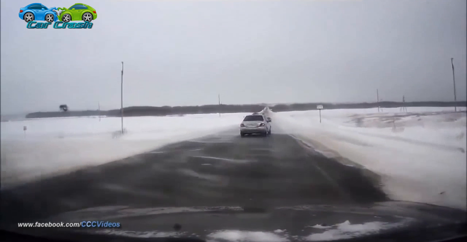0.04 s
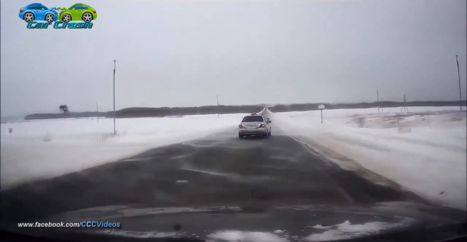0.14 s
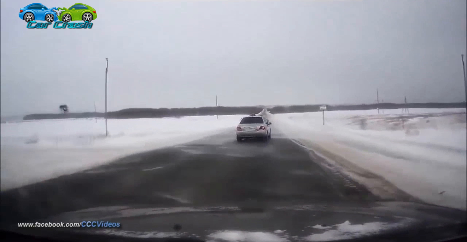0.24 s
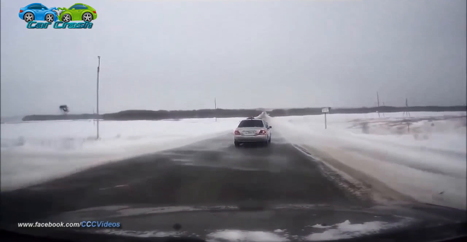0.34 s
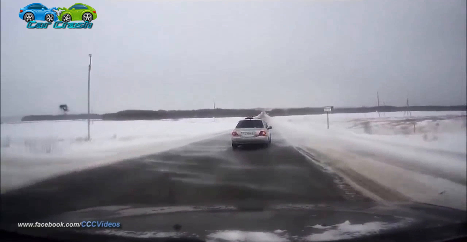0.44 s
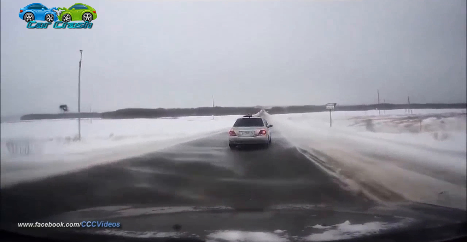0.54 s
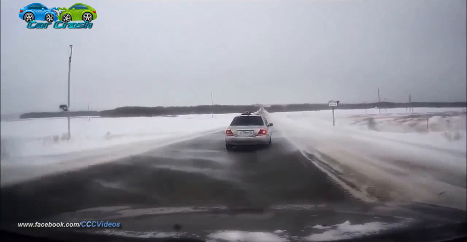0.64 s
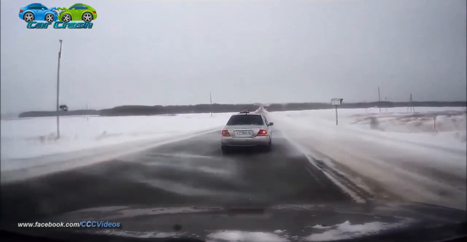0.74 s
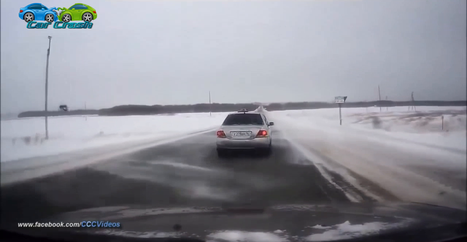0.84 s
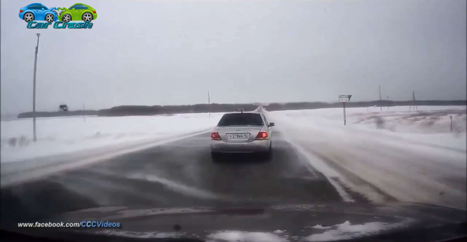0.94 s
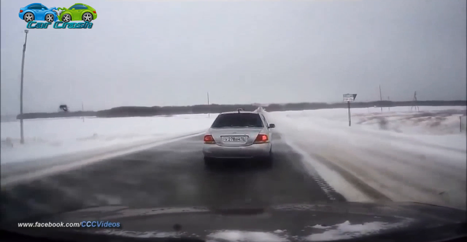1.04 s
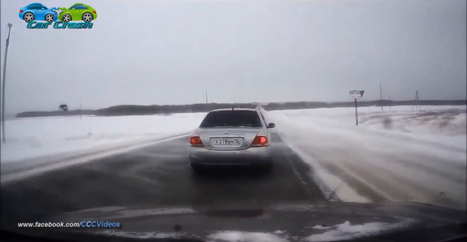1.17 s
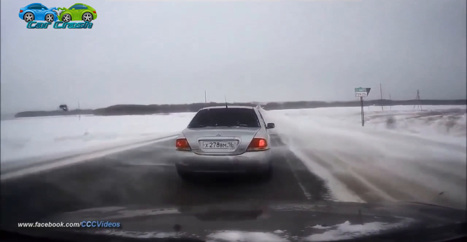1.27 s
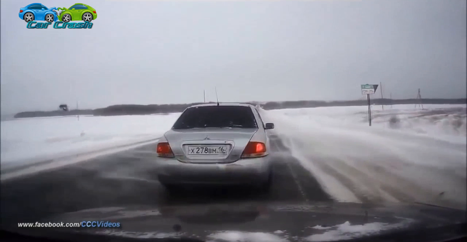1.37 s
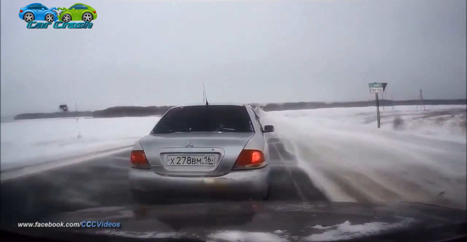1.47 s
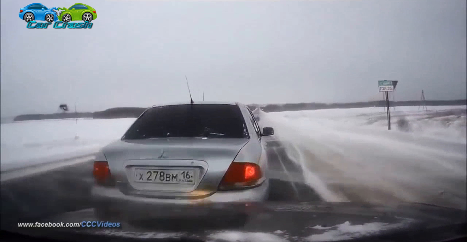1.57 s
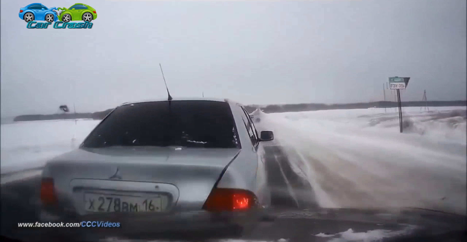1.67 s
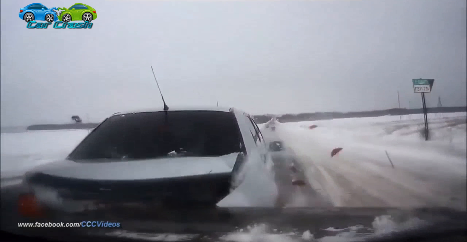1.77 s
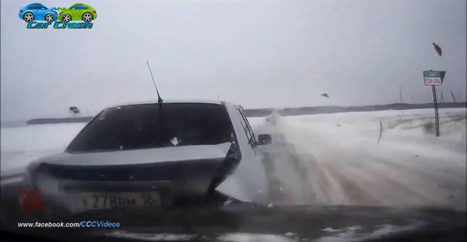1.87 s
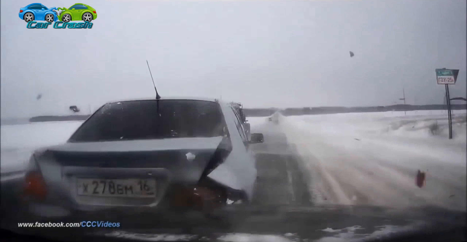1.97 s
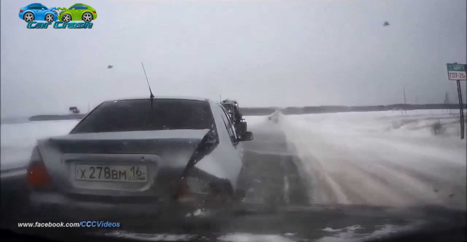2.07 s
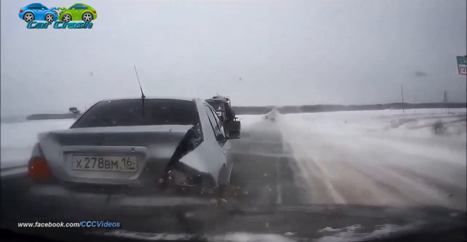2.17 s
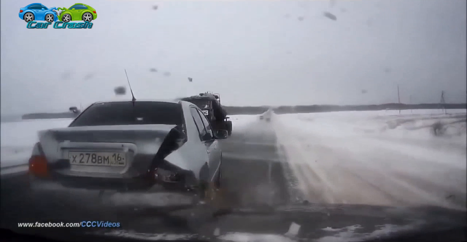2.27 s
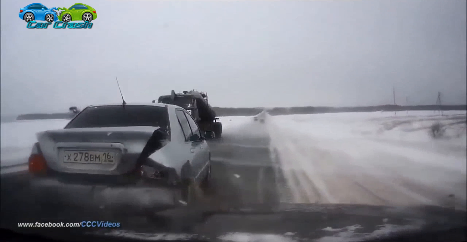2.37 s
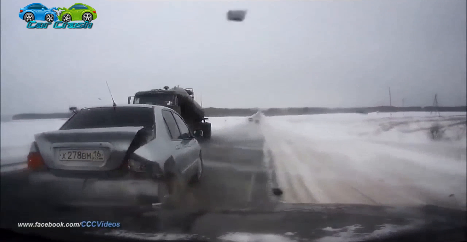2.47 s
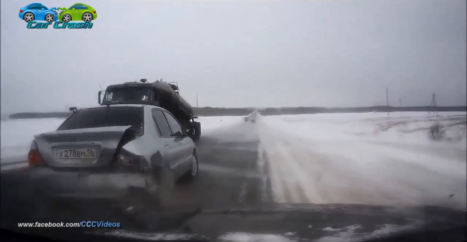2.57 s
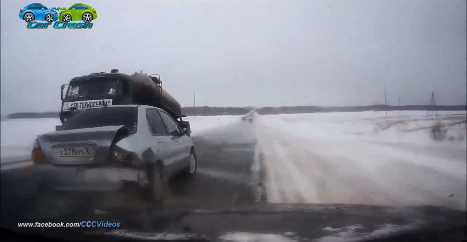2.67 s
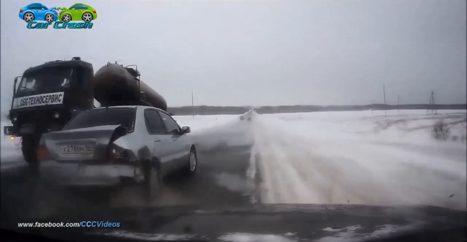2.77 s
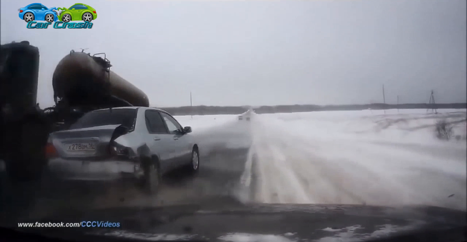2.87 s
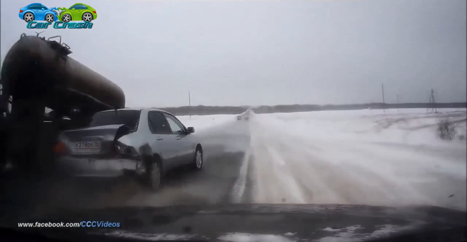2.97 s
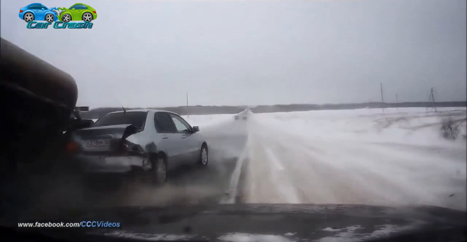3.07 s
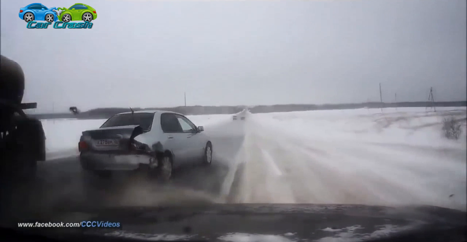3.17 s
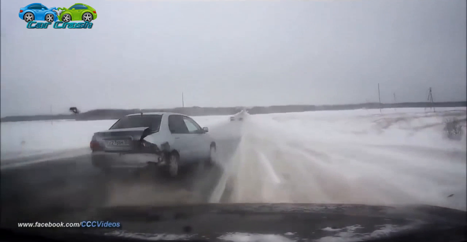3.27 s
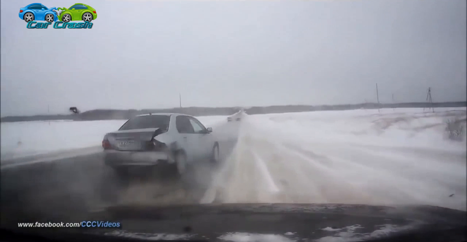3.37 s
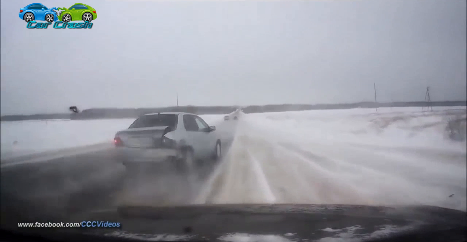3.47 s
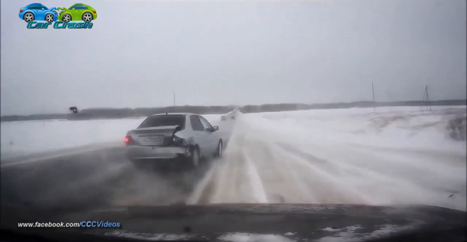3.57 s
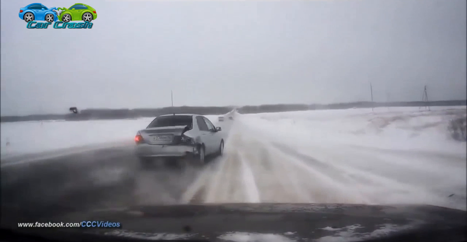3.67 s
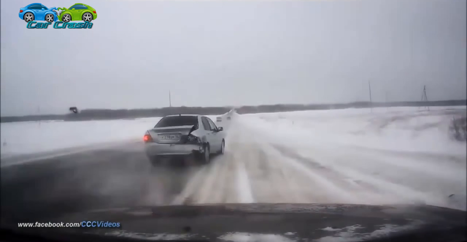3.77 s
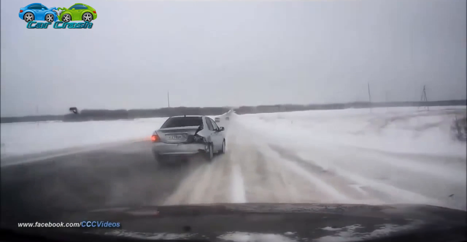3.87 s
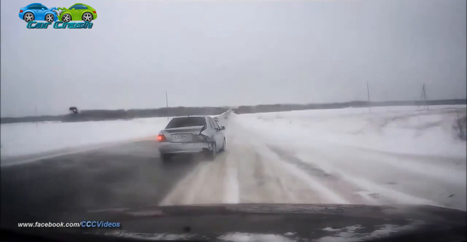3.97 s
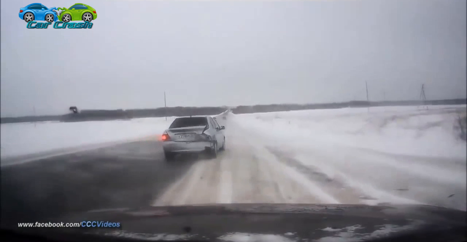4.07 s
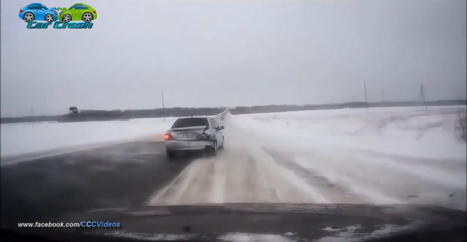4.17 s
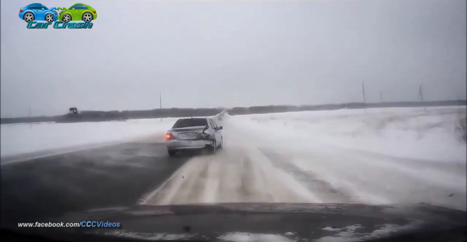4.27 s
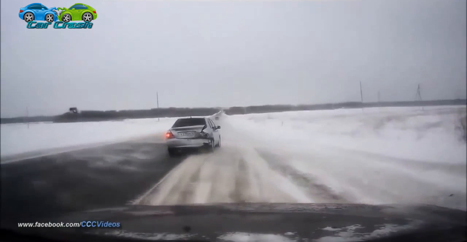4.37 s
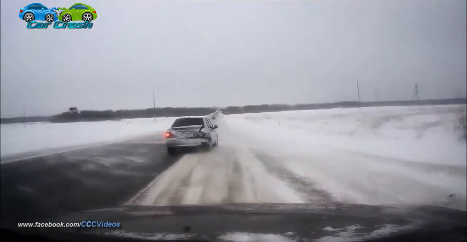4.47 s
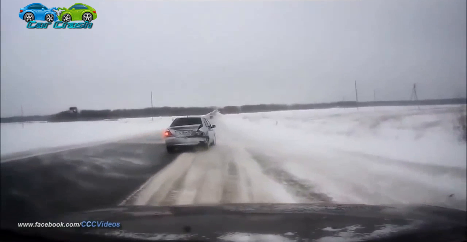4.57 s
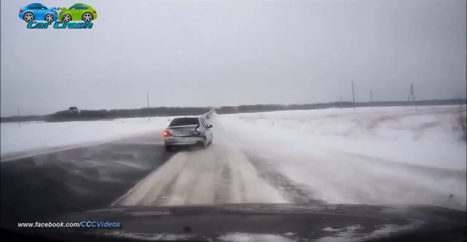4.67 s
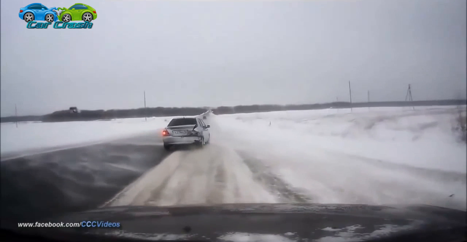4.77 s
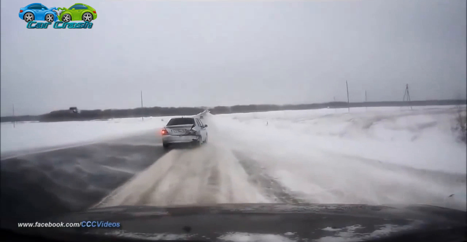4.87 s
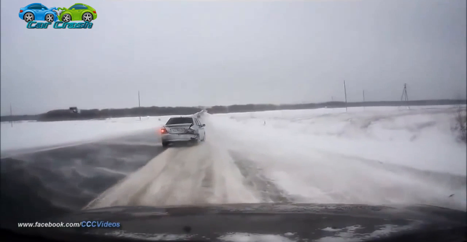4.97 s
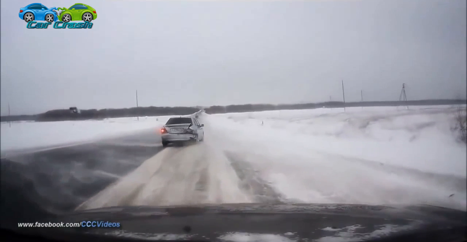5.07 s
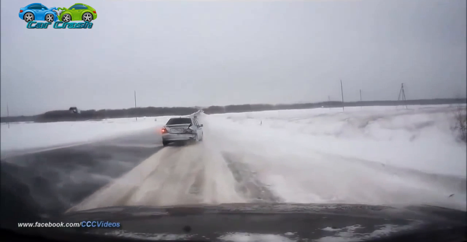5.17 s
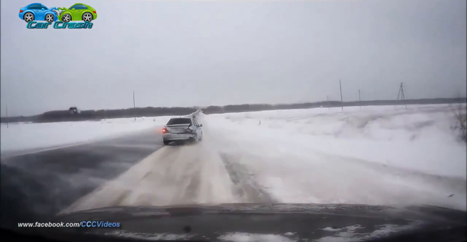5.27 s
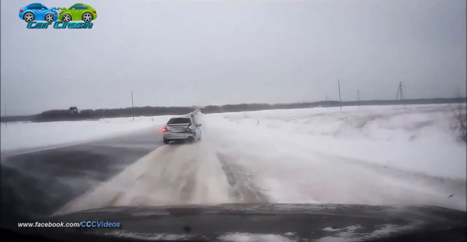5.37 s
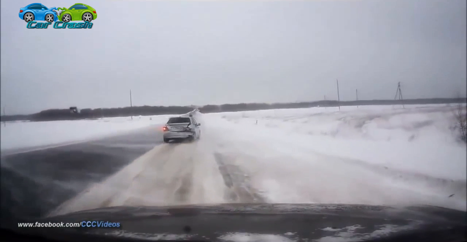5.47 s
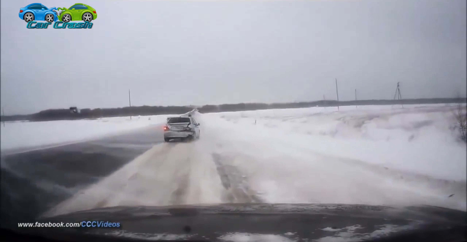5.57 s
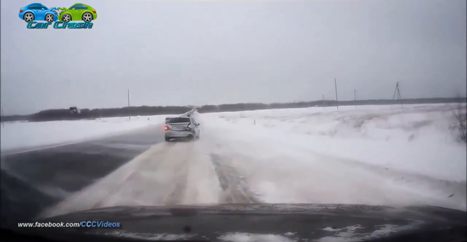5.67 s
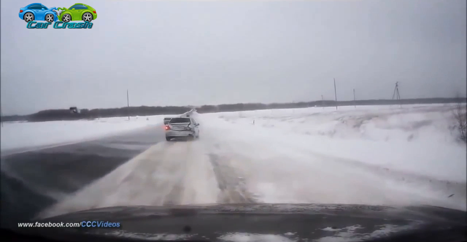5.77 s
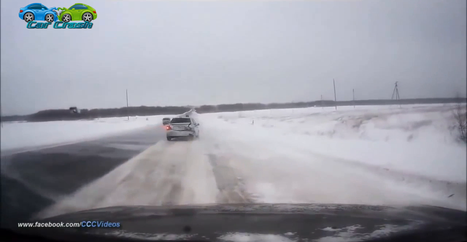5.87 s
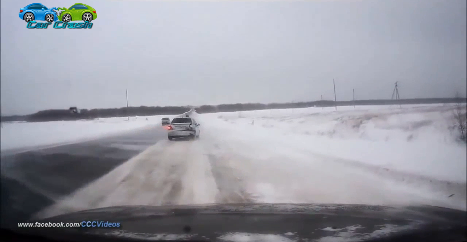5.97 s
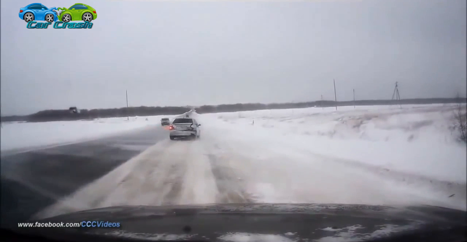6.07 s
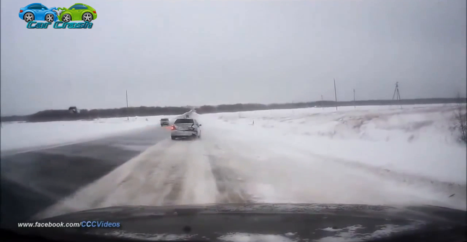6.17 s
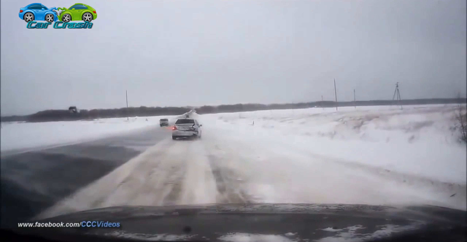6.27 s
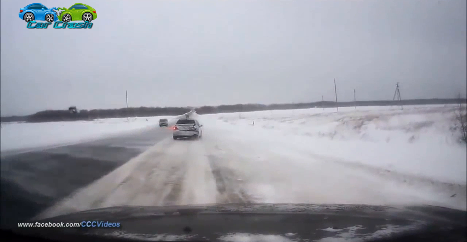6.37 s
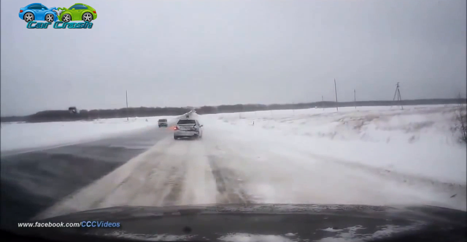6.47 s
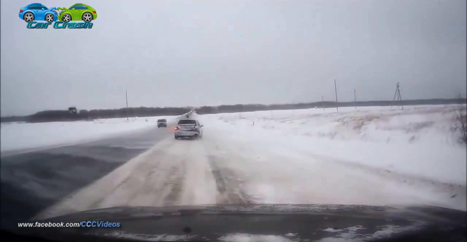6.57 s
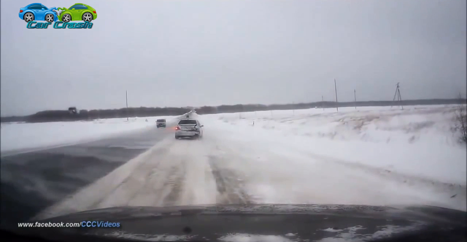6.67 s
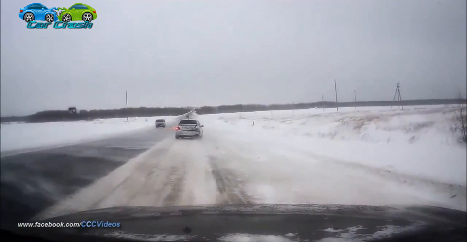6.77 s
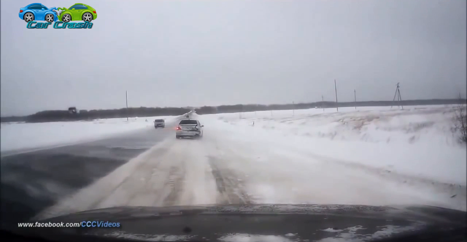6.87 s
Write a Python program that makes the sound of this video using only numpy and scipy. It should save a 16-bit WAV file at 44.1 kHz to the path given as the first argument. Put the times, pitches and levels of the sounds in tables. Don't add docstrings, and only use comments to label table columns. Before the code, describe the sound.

Inside a moving car, steady road noise is smashed by a distorted rear-end collision, debris clatters, then quieter rolling on snow with a bent part ticking.

```python
import sys
import numpy as np
from scipy import signal
from scipy.fft import rfft, irfft
from scipy.io import wavfile
from scipy.ndimage import uniform_filter1d

SR = 44100
rng = np.random.default_rng(int(sys.argv[2]) if len(sys.argv) > 2 else 0)


def generate_wav(signal):
    frames = np.transpose(np.atleast_2d(signal))
    scaled = np.clip(frames, -1, 1) * 32767
    pcm = np.round(scaled).astype(np.int16)
    wavfile.write(sys.argv[1], SR, pcm)


def invert_db(x):
    u = np.asarray(x, float) / 20
    return 10 ** u


N = 306042
SNOW_FROM_S = 2.3

# frequency in Hz, level in dB per Hz.
SHARD_TONE = [(820, -15), (1400, -8), (1840, -16), (2030, -2), (2180, -8.5), (2520, 0.5), (2880, -6.5),
              (3400, -7.5), (4060, -11), (4850, -37.5), (5500, -16.5), (7150, -45), (12100, -120)]


def colour(x, tone):
    hz, db = np.transpose(tone)
    log_hz = np.log(np.maximum(np.arange(4097) * SR / 8192, 1))
    log_gain = np.interp(log_hz, np.log(hz), db, db[0] - 30, db[-1] - 30) * np.log(10) / 20
    cepstrum = irfft(log_gain)
    cepstrum[1:4096] *= 2
    cepstrum[4097:] = 0
    y = signal.fftconvolve(x, irfft(np.exp(rfft(cepstrum))))[:N]
    return y / np.std(y)


def band(x, lo_hz, hi_hz):
    y = signal.sosfilt(signal.butter(2, [lo_hz, hi_hz], "bandpass", fs=SR, output="sos"), x)
    return y / np.std(y)


def walk(rate):
    k = int(SR / rate)
    steps = np.repeat(rng.standard_normal(N // k + 1), k)
    return 1.3 * uniform_filter1d(uniform_filter1d(steps, k), k)[:N]


def grit(per_s, spread_db, smooth):
    sizes = invert_db(spread_db * rng.exponential(size=N)) * rng.standard_normal(N)
    clicks = sizes * (rng.random(N) < per_s / SR)
    return clicks / np.std(clicks) + smooth * rng.standard_normal(N)


def ring(hz, t60, phase=0):
    t = np.arange(int(t60 * SR)) / SR
    contact_s = np.clip(1.3 / (hz or SR), 0.0009, 0.0022)
    push = np.sin(np.pi / 2 * np.minimum(t / contact_s, 1)) ** 2
    return np.sin(2 * np.pi * hz * t + phase) * np.exp(-np.log(1000) * t / t60) * push


def add(out, s, x):
    i = int(s * SR)
    out[i:i + len(x)] += x[:N - i]


def blows():
    # start in seconds, level in dB
    # before overload, # ring in Hz, decay time t60 in seconds, push direction (1 or -1).
    body_blows = [(1.722, -1.5, 105.1, 0.24, 1), (1.74, -1.5, 160.4, 0.36, 1), (1.752, 2.5, 55.3, 0.4, 1),
                  (1.785, -0.5, 196, 0.16, -1), (1.807, -1.5, 91.5, 0.23, 1), (1.819, -3, 152.8, 0.14, 1),
                  (1.842, -1.5, 45, .05, -1), (1.855, 1, 25.5, 0.26, 1), (1.859, -5, 130, .02, -1),
                  (1.779, 1, 60, .03, 1), (1.87, -5, 70, .03, 1), (1.88, -1, 90, 0.04, 1),
                  (1.927, -1, 70, .03, 1), (1.89, 7, 51.3, 0.16, 1), (1.911, 4, 31.1, 0.081, 1),
                  (1.917, -7, 109, .03, -1), (1.922, 2.5, 70, 0.048, 1), (1.934, -6, 70, 0.03, -1),
                  (1.938, -2, 55, .06, 1), (1.958, -15, 252.6, 0.054, -1), (1.98, -19, 226, .06, 1),
                  (2.005, -15.5, 45, .08, -1), (2.033, -13, 60, .08, -1), (2.112, -17, 75, .05, 1),
                  (1.965, -13.5, 25, 0.16, -1), (1.999, -23, 133.4, 0.29, 1), (2.133, -12.5, 134, 0.2, 1),
                  (2.165, -6.5, 138, 0.2, -1), (2.171, -15.5, 241, 0.12, 1), (2.197, -19, 135, 0.049, 1),
                  (2.329, -28, 190.7, 0.31, 1), (2.795, -15.5, 122, 0.14, 1), (2.823, -14, 176, 0.033, -1),
                  (2.841, -17.5, 69.4, 0.16, 1), (4.759, -16, 71, 0.22, 1)]
    out = np.zeros(N)
    for s, db, hz, t60, push in body_blows:
        add(out, s, push * invert_db(db) * ring(hz, t60))
    return out


def clangs():
    # start in seconds, level in dB, ring in
    # Hz, decay time t60 in seconds.
    panel_clangs = [(1.728, -19.5, 694, 0.041), (1.756, -1.5, 970, 0.016), (1.896, -22, 520, 0.03),
                    (1.97, -24, 422, 0.17), (2.327, -26, 1300, 0.035), (2.374, -23, 560, 0.088),
                    (2.39, -25.5, 620, 0.081), (3.088, -37, 1360, .04), (3.165, -34.5, 1200, 0.044),
                    (2.168, -19, 1030, .05), (2.2, -44, 1080, 0.058), (1.737, -7.5, 636, 0.047),
                    (1.78, -6.5, 500, 0.067), (1.77, -12.5, 970, 0.033), (1.796, -4.5, 700, 0.046),
                    (1.815, -12, 620, 0.041), (1.856, -13.5, 300, .04), (2.131, -20, 250, .12),
                    (2.168, -19, 530, .05), (2.237, -24, 630, .06), (2.255, -25, 776, .04),
                    (1.934, -15, 820, .05), (2.83, -34, 1100, .05), (3.45, -34, 800, .05),
                    (2.257, -27.5, 1300, .06), (1.931, -18.5, 1300, 0.048), (1.957, -23, 810, .06),
                    (2.012, -28, 1250, 0.036), (2.142, -21.5, 790, 0.054), (2.1, -27, 610, .05),
                    (2.819, -27, 430, 0.054), (2.351, -35.5, 1300, .04), (2.165, -23, 2030, .04),
                    (2.13, -26.5, 930, .06), (2.79, -26.5, 330, .07), (2.835, -27.5, 260, 0.077),
                    (3.6, -32, 480, .05), (3.742, -29.5, 900, .04), (3.733, -43.5, 2450, .09),
                    (5.217, -54, 1800, .04), (6.6, -59, 2600, .04), (4.585, -55, 2400, 0.1),
                    (3.1, -30, 700, .05), (6.234, -49, 1300, 0.07), (6.925, -39, 940, .05),
                    (6.44, -38, 550, .04), (6.441, -41, 1020, 0.033), (6.231, -46, 790, .04),
                    (4.017, -33, 600, 0.045), (5.863, -42, 560, .04), (3.447, -33, 455, .04),
                    (1.819, -10, 700, .04),
                    (1.7293, -17, 1150, .025), (1.745, -14, 1250, .025), (1.7575, -12, 1100, .025),
                    (1.772, -13, 1350, .025), (1.79, -9, 1150, .03), (1.801, -12, 1550, .025),
                    (1.811, -15, 1100, .03), (1.822, -16, 1300, .025), (1.83, -15, 1000, .03),
                    (1.873, -24, 1100, .03), (1.947, -23, 700, .06), (2.377, -26, 590, .06),
                    (2.168, -21, 800, .05), (6.232, -46, 1150, .07), (3.044, -27, 700, .04),
                    (3.146, -42, 2600, .03), (3.356, -38, 2000, .05)]
    out = np.zeros(N)
    for s, db, hz, t60 in panel_clangs:
        add(out, s, invert_db(db) * ring(hz, t60))
    return out


def bursts(level_db, share, linger):
    # start in seconds, level in dB, hold in seconds,
    # decay time t60 in seconds, brightness in dB.
    crumple_bursts = [(1.724, -15.5, 0.078, 0.11, 0.5), (1.78, -30, 0.0088, 0.09, 9),
                      (1.815, -21.5, 0.043, 0.22, -2), (1.879, -23.5, 0.033, 0.17, 2),
                      (1.921, -22.5, .016, 0.12, 8.5), (1.952, -26.5, 0.007, 0.72, 0.5),
                      (1.731, -27.5, 0.029, .08, 9.5), (2.127, -32, 0.04, 0.19, 8),
                      (2.172, -31, .02, .3, 8.5), (2.252, -30, 0.017, 0.14, 3),
                      (2.158, -17.5, 0.0035, 0.058, -0.5), (2.196, -35.5, 0.09, 0.25, 4),
                      (2.318, -35, 0.02, .3, 4.5), (2.345, -38, .015, .3, 5.5),
                      (2.373, -33, 0.016, 0.25, 0), (2.395, -38.5, .015, .3, 5),
                      (2.45, -48.5, .02, 0.45, 8.5), (2.771, -40, 0.084, 0.33, -20)]
    attack_s = 0.0096
    t, power = np.arange(N) / SR, 0
    for s, db, hold, t60, bright_db in crumple_bursts:
        rise = np.clip((t - s) / attack_s, 0, 1)
        fall_db = -60 * np.maximum(t - s - attack_s - hold, 0) / (t60 * linger)
        power = power + (rise * invert_db(db + level_db + share * bright_db + fall_db)) ** 2
    return np.sqrt(power)


def crumple():
    # level in dB, share of the burst's brightness, share of its decay time.
    materials = [
        (1, -0.14, 1.01),
        (-17.5, 0.99, .99),
        (-29, 0.96, 1.1),
    ]
    # frequency in Hz, level in dB per Hz.
    panel_tone = [(120, -31.5), (200, 0), (243, 3.5), (278, -3.5), (462, -7), (802, -11), (937, -15),
                  (1390, -22.5), (1800, -41), (2340, -55.5), (3960, -120)]
    # frequency in Hz, level in dB per Hz.
    dust_tone = [(2650, -36), (4500, 1.5), (4880, -6.5), (5750, -6.5), (15000, -23), (15400, -24),
                 (15900, -37.5)]
    panels, shards, dust = (bursts(*material) for material in materials)
    snaps, specks = grit(2500, 2.2, 0.8), grit(3000, 1.8, 1.3)
    out = panels * colour(snaps, panel_tone)
    out += shards * colour(snaps, SHARD_TONE)
    out += dust * colour(specks, dust_tone)
    clumps = invert_db(2.1 * walk(45.34))
    return clumps * out


def puff(noise, s, sharp=1):
    i = int(s * SR)
    fade = ring(0, 0.049, np.pi / 2)
    return fade[:N - i] ** sharp * noise[i:i + len(fade)]


def hits():
    # start in seconds, click peak in dB, click in Hz,
    # knock in dB over the click, top (treble) in dB over the click.
    stiff_hits = [(1.8247, -17.5, 1920, 8.5, -17), (1.926, -15, 2410, 5.5, -20),
                  (2.132, -32, 2570, 8.5, -28), (2.168, -15.5, 2020, 4, -29),
                  (2.257, -26.5, 2640, 6.5, -30), (2.3246, -37, 2340, -2, -30.5),
                  (2.498, -36.5, 2570, -8, -26)]
    # start in seconds, click peak in dB, click in Hz,
    # knock in dB over the click, top (treble) in dB over the click.
    soft_hits = [(1.737, -31.5, 1870, 23, -12), (1.7688, -17.5, 2050, 8, -27), (1.7986, -19.5, 2420, 5, -9),
                 (1.9084, -31, 2295, 8, -16.5), (1.7873, -11, 2230, 13.3, -9), (1.873, -44, 2340, 4, -27),
                 (2.2164, -46.5, 2380, 10, -21), (2.2378, -29, 2800, 9.4, -26.5),
                 (2.3794, -41.5, 2730, 8, -19)]
    # start in seconds, click peak in dB,
    # knock in dB over the click.
    wheel_knocks = [(3.085, -38.5, 5), (3.1632, -40, 8), (3.443, -38.5, 9), (3.7372, -39.5, 14),
                    (4.0144, -44, 16), (4.0817, -50, 8), (4.2865, -55.5, 24.5), (4.5813, -50, 19),
                    (4.7705, -49, 3), (4.9038, -49.5, 15), (5.218, -58, 18), (5.5323, -51.5, 12),
                    (5.8597, -52.5, 12), (6.1594, -46.5, 12.5), (6.4408, -50, 9), (6.9267, -50, 20)]
    rows = [(s, db, hz, 791, low, top) for s, db, hz, low, top in stiff_hits]
    rows += [(s, db, hz, 606, low, top) for s, db, hz, low, top in soft_hits]
    return rows + [(s, db, 2387, 622, low, -31) for s, db, low in wheel_knocks]


def knocks(crack, rattle, thud):
    # frequency in Hz, level in dB.
    dash_modes = [(2050, -4.5), (2420, 3), (2600, -13), (2850, -3), (3110, -2), (3780, -9), (4200, -22)]
    t60_s, lag_s = 0.049, 0.003
    out = np.zeros(N)
    for s, db, click_hz, knock_hz, low_db, top_db in hits():
        add(out, s, invert_db(db - 2) * ring(click_hz, 0.5 * t60_s))
        for mode_hz, mode_db in dash_modes:
            detune, size = rng.standard_normal(2)
            mode = ring(mode_hz * (1 + 0.0327 * detune), 1.7 * t60_s)
            add(out, s, invert_db(db + mode_db + 2.8 * size - 14.5) * mode)
        knock_db = db + low_db
        add(out, s + lag_s, invert_db(knock_db - 2.5) * ring(knock_hz, 1.15 * t60_s))
        add(out, s + lag_s, invert_db(knock_db - 15.5) * puff(thud, s))
        add(out, s, invert_db(db - 16.5) * puff(rattle, s))
        add(out, s + 2 * lag_s, -invert_db(knock_db - 2) * ring(192, 0.03))
        add(out, s, invert_db(db + top_db - 6.5) * puff(crack, s, 1.4))
    return out


def splinters(crack, chip):
    # start in seconds, peak in dB, ring in Hz, top (treble) in dB over the ring.
    splinter_hits = [(1.729, -15.5, 2520, -10.5), (1.7372, -13.5, 2340, -10.5), (1.745, -17, 2900, -12),
                     (1.7515, -15, 2500, -12), (1.7567, -13, 2690, -12), (1.762, -13, 3020, -8),
                     (1.7725, -14, 2400, -12), (1.7845, -12.5, 2000, -16), (1.7932, -11, 2610, -6.5),
                     (1.803, -11.5, 2600, -8.5), (1.8317, -14, 2600, -12), (1.848, -22, 2300, -20),
                     (1.898, -20, 2880, -22), (1.933, -19, 2450, -14), (1.9386, -20, 2700, -12),
                     (1.95, -27, 2500, -14), (2.176, -27, 2700, -14), (2.187, -30, 3100, -14),
                     (2.264, -31, 2900, -20), (2.352, -36, 2800, -20), (2.405, -34, 3000, -20),
                     (2.4563, -39, 3700, -22), (2.5292, -38, 3740, -21), (2.55, -36.5, 3480, -15),
                     (2.617, -39, 3870, -16), (2.716, -43, 3750, -26), (2.9094, -49, 3620, -19),
                     (3.1447, -41, 3920, -16), (3.48, -40, 3880, -23), (4.4518, -47.5, 3800, -18),
                     (4.771, -52, 3770, -14), (6.114, -62, 3620, -11)]
    out = np.zeros(N)
    for s, db, hz, top_db in splinter_hits:
        add(out, s, invert_db(db - 4) * ring(hz, 0.016))
        add(out, s, invert_db(db - 18.5) * puff(chip, s, 2.1))
        add(out, s, invert_db(db + top_db - 2) * puff(crack, s, 4.1))
    return out


def pieces(crack, rattle, thud):
    # start in seconds, ring level in dB, crack in dB, thud in dB.
    landings = [
        (2.073, -9.5, -39, -17.5),
        (2.4845, -15.5, -41.5, -33),
        (3.047, -30, -76, -39),
        (3.35, -30.5, -66, -38),
        (6.229, -46.5, -80, -48),
    ]
    # frequency in Hz, level in dB, decay time t60 in seconds.
    piece_modes = [
        [(688, -4.5, 0.13), (805, 3.5, 0.036), (1230, -7.5, 0.036), (2020, -12, 0.023), (2340, -9.5, 0.033), (2640, -1, 0.023), (2870, -6, 0.027), (2936, -15.5, 0.033), (4040, -17, 0.042)],
        [(874, -8.5, 0.025), (1030, -8.5, 0.018), (1870, -35, 0.22), (2720, 4, 0.011), (3020, -6.5, 0.019), (3456, -30.5, 0.037), (3770, 3.5, 0.011), (4400, -32, 0.071), (4620, -17.5, 0.015)],
        [(424, 11, 0.042), (560, 13.5, 0.026), (790, 9, 0.043), (1180, -3, 0.06), (1260, -3.5, 0.048), (1440, -8.5, .03)],
        [(538, 7.5, 0.06), (1250, -1.5, 0.046), (1940, -0.5, 0.039), (2370, -11, 0.046), (3700, -11, 0.026)],
        [(476, 15.5, 0.066), (1130, 8, .06), (1280, 12.5, 0.043), (1920, -11, .04), (2570, -3, .03), (3080, -10, .03)],
    ]
    out = np.zeros(N)
    for (s, db, crack_db, thud_db), modes in zip(landings, piece_modes):
        for hz, mode_db, t60 in modes:
            add(out, s, invert_db(db + mode_db) * ring(hz, min(t60, 0.07)))
        add(out, s, invert_db(crack_db) * puff(crack, s, 1.1))
        add(out, s, invert_db(crack_db + 16.5) * puff(rattle, s))
        add(out, s, invert_db(thud_db) * puff(thud, s))
    return out


def debris():
    crack = band(rng.standard_normal(N), 4100, 9500)
    rattle = colour(rng.standard_normal(N), SHARD_TONE)
    thud = band(rng.standard_normal(N), 450, 1600)
    chip = band(rng.standard_normal(N), 3000, 6500)
    return knocks(crack, rattle, thud) + splinters(crack, chip) + pieces(crack, rattle, thud)


def surface_noise(tones):
    x = rng.standard_normal(N)
    on_asphalt = np.arange(N) < SNOW_FROM_S * SR
    return np.where(on_asphalt, colour(x, tones[0]), colour(x, tones[1]))


def road_gains():
    # time in seconds, tyre load in dB, surface roughness in dB.
    roll_path = [(0, 0, 0.2), (.28, 3.5, -0.3), (.47, -0.5, 0), (.93, -1, -0.5), (1.15, -3, -0.5),
                 (1.35, 1.5, -2.5), (1.51, -2, -2), (1.7, -3.5, 3), (2.56, 0, -0.5), (2.92, 0, 0),
                 (3.3, 0.5, 0.7), (3.7, -2, 4), (4.03, -4, 3.5), (4.4, -6, 5.5), (4.76, -7, 3.5),
                 (5.04, -9.5, 4), (5.9, -9.5, 0.5), (6.5, -9.5, 1)]
    # time in seconds, swell (or dip, if
    # negative) of the rumble in dB.
    bumps = [(.37, 3), (.65, 4), (.742, 3), (.89, -2), (1.306, -1), (1.628, 0.5), (1.71, -9), (2.3, -8),
             (2.81, 4), (2.95, 3), (3.11, -7), (2.87, 3.5), (3.18, 1), (3.25, 2), (3.45, 2), (3.53, 1.5),
             (3.59, 1.5), (3.65, 2), (3.7, 1.5), (4.25, -3.5), (4.3, 5), (4.77, 7), (4.93, 5.5), (5.03, 5),
             (5.24, 5), (5.34, 4), (5.5, 3.5), (5.67, 3), (5.87, 1), (6.18, 6.5), (6.27, 0.5), (6.34, 0.5),
             (6.44, 2.5), (6.72, 2.5), (6.82, 1)]
    # level on asphalt in dB, level on snow in dB,
    # dB per dB of tyre load on asphalt, the same on snow.
    road_layers = [
        (-26.5, -27, 0.43, 1.21),
        (-34.5, -36.5, 0.36, 0.59),
        (-34.5, -39.5, 0.87, 0.71),
        (-54, -54.5, 0.73, 1.84),
    ]
    bump_s = 0.022
    t = np.arange(N) / SR
    times, load_db, rough_db = np.transpose(roll_path)
    load, rough = np.interp(t, times, load_db), np.interp(t, times, rough_db)
    for s, db in bumps:
        rough = rough + db * np.exp(-0.5 * ((t - s) / bump_s) ** 2)
    gains = []
    for asphalt_db, snow_db, asphalt_slope, snow_slope in road_layers:
        on_asphalt, on_snow = asphalt_db + asphalt_slope * load, snow_db + snow_slope * load
        gains.append(invert_db(np.where(t < SNOW_FROM_S, on_asphalt, on_snow)))
    rumble, drone, roar, hiss = gains
    return rumble * invert_db(rough), drone * invert_db(0.073 * rough), roar, hiss


def road():
    # frequency in Hz, level in dB per Hz.
    rumble_tones = [
        [(8.8, -31.5), (15, -7), (32, 0), (70, 1), (97, -4.5), (131, -1), (184, -19.5), (220, -11.5), (290, -40.5), (480, -120)],
        [(8.8, -37), (15, -9), (33, -3), (76, 0), (119, -3), (188, -19), (220, -18.5), (290, -44.5), (480, -120)],
    ]
    drone_tones = [
        [(100, -33.5), (170, 1), (188, -8), (231, 1.5), (280, -0.5), (319, 2.5), (424, -4.5), (499, -2), (620, -26.5), (810, -26.5), (1360, -120)],
        [(100, -30), (170, -10.5), (291, 1.5), (367, -1.5), (434, -10), (481, -4), (620, -23), (810, -37.5), (1360, -120)],
    ]
    roar_tones = [
        [(330, -25.5), (560, 1.5), (664, -1.5), (715, -2), (940, -6), (1130, -0.5), (1250, -6), (1410, -7), (1520, -15), (1800, -22.5), (2340, -27.5), (3960, -120)],
        [(330, -18), (560, 1), (652, -1.5), (705, -2), (882, -4), (973, -8), (1140, -7.5), (1420, -18.5), (1800, -39.5), (2340, -56), (3960, -120)],
    ]
    hiss_tones = [
        [(1000, -37.5), (1700, -13), (1790, -11.5), (2210, 1.5), (2510, -1), (3450, -15), (3910, -15.5), (5050, -30.5), (13000, -35.5)],
        [(1000, -36), (1700, -8.5), (1760, -9), (2200, 0.5), (2420, -1), (2900, -3), (3310, -12), (3870, -10.5), (4100, -22), (4610, -28.5), (6000, -33.5), (7800, -56.5), (13200, -120)],
    ]
    rumble, drone, roar, hiss = road_gains()
    surface = walk(9.7)
    shake = surface_noise(rumble_tones)
    shake /= np.sqrt(uniform_filter1d(shake ** 2, int(0.07 * SR)) + 0.04)
    out = rumble * shake
    out += drone * invert_db(0.68 * walk(14) + 0.61 * surface - 2) * surface_noise(drone_tones)
    out += roar * invert_db(0.7 * walk(20) + 0.7 * surface - 4) * surface_noise(roar_tones)
    out += hiss * invert_db(0.43 * walk(25) + 1.2 * surface) * surface_noise(hiss_tones)
    return out


def scene():
    return (blows() + clangs() + crumple() + debris() + road())[None]


def preamp_noise():
    # frequency in Hz, level in dB per Hz.
    preamp_tone = [(1760, -27), (3000, -7.5), (5160, -9), (7480, -11.5), (7690, -8.5), (8380, -11),
                   (14500, -11.5), (16500, -13.5)]
    whine = np.sqrt(2) * np.sin(2 * np.pi * np.cumsum(7870 + 15 * walk(30)) / SR)
    own = invert_db(-75.5) * colour(rng.standard_normal(N), preamp_tone) + invert_db(-85) * whine
    return signal.sosfilt(signal.ellip(10, 0.2, 60, 15150, fs=SR, output="sos"), own)


def overload(dry):
    clip_at, leak, leak_top = 0.3, 0.15, 0.02
    flat = np.clip(dry, -clip_at, clip_at)
    excess = dry - flat
    treble = excess - uniform_filter1d(excess, size=30)
    flat = flat + leak_top * np.tanh(leak / leak_top * treble)
    return signal.sosfilt(signal.butter(1, 0.6, "highpass", fs=SR, output="sos"), flat)


def low_pass(x):
    return signal.sosfilt(signal.butter(12, 16660, fs=SR, output="sos"), x)


def record(dry):
    steep = signal.ellip(10, 0.2, 70, 15700, fs=SR, output="sos")
    mix = signal.sosfilt(steep, overload(dry) + preamp_noise())
    return low_pass(mix)


dry = scene()
out = record(dry)
generate_wav(out)
```